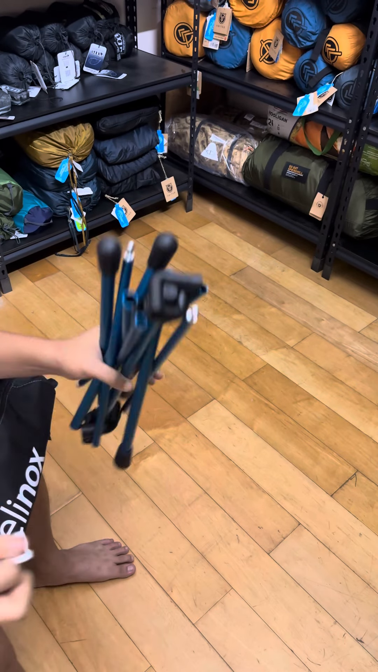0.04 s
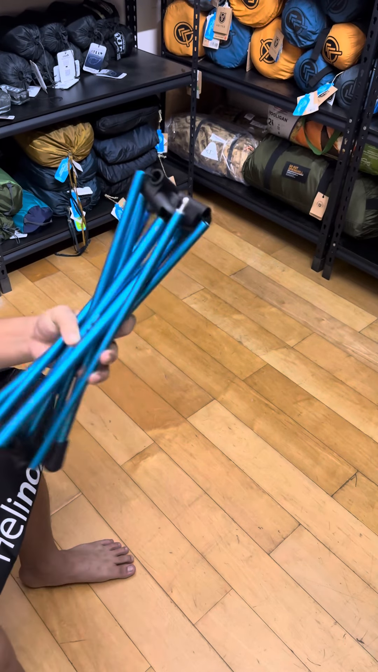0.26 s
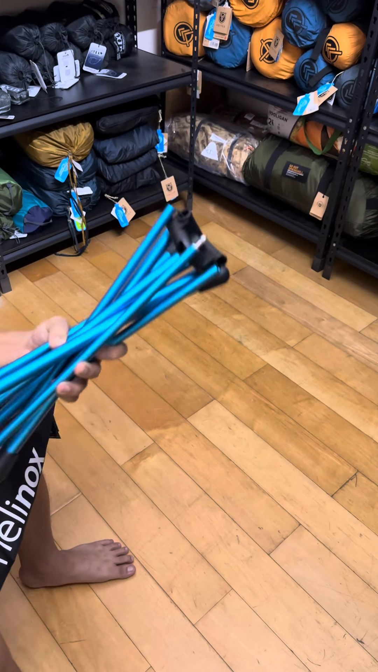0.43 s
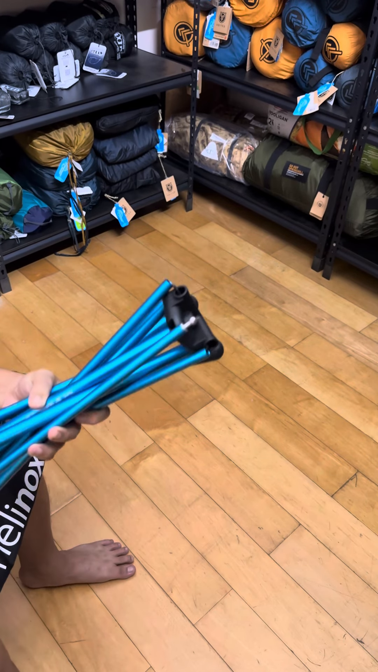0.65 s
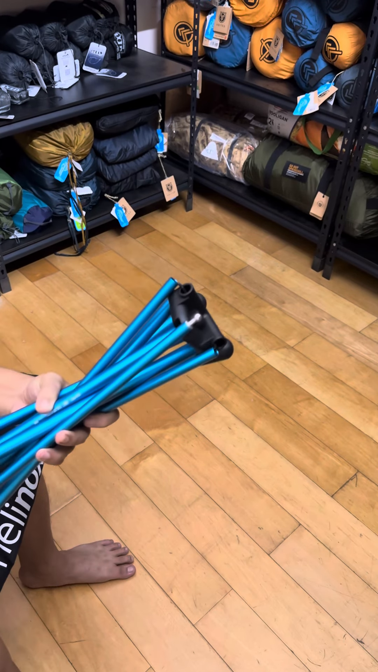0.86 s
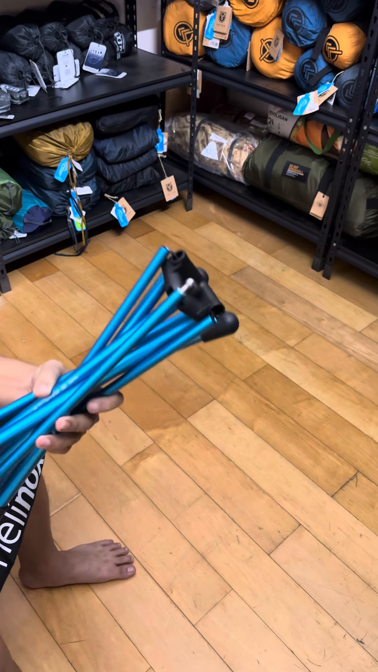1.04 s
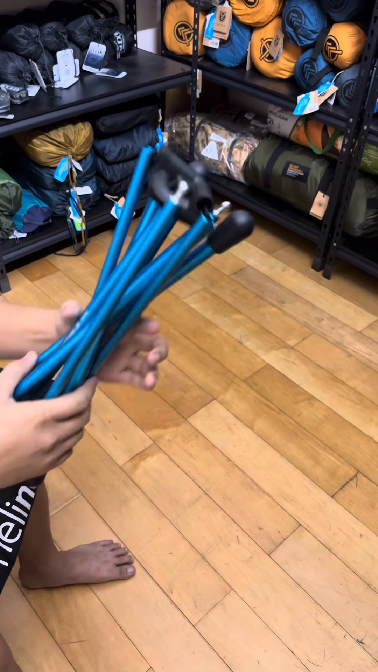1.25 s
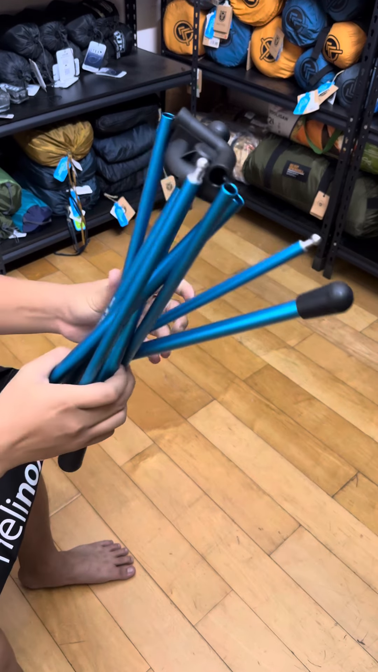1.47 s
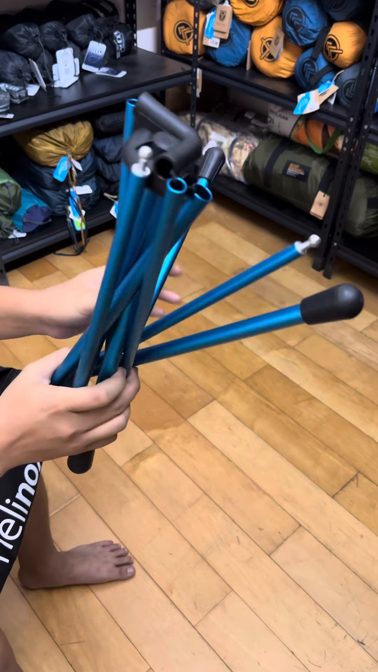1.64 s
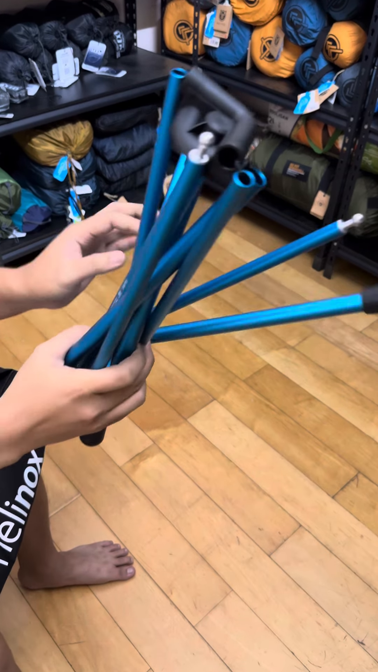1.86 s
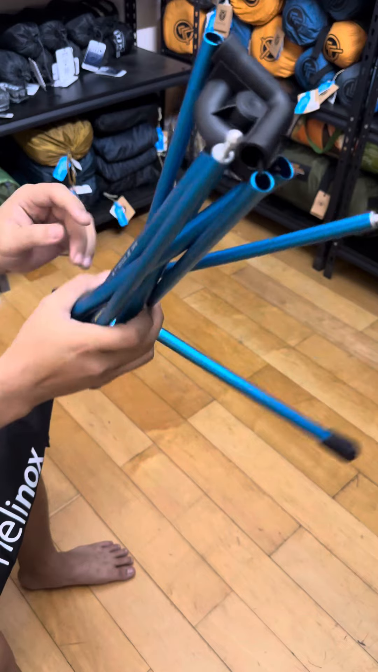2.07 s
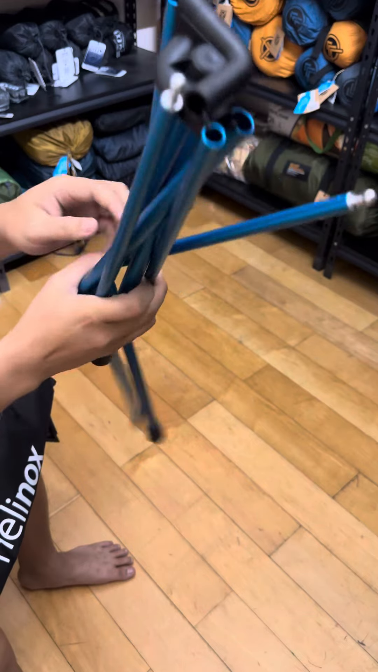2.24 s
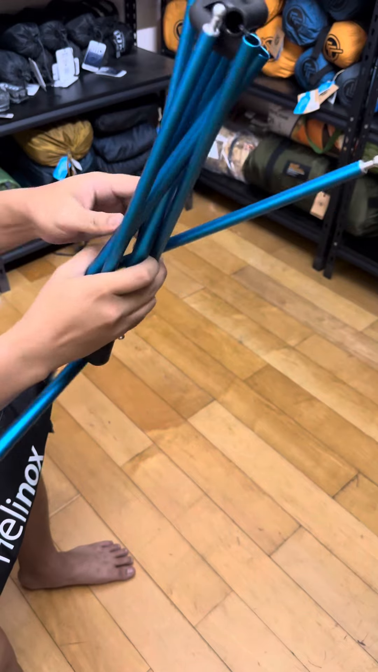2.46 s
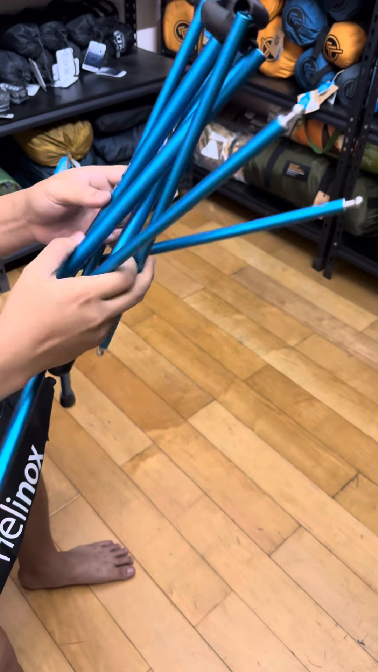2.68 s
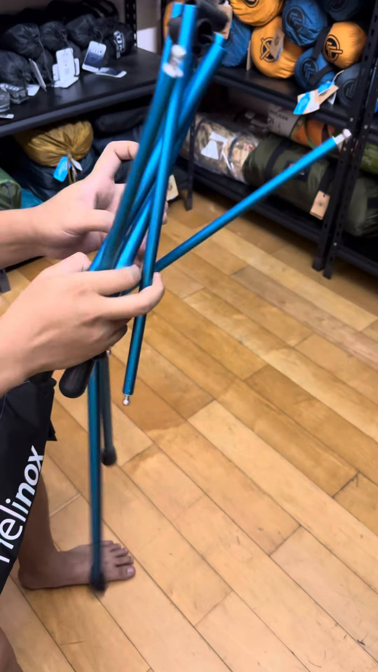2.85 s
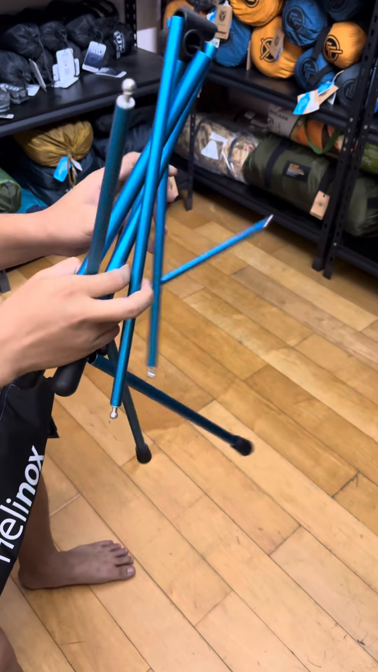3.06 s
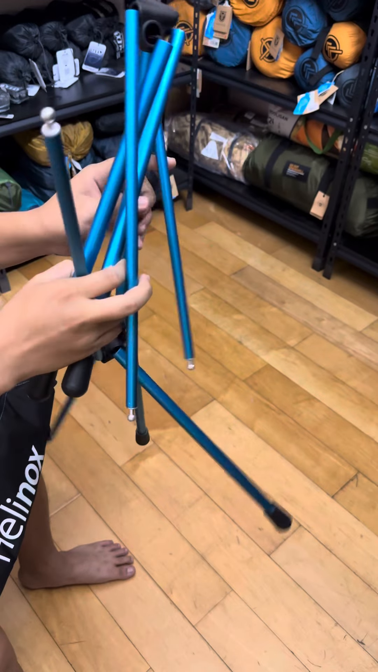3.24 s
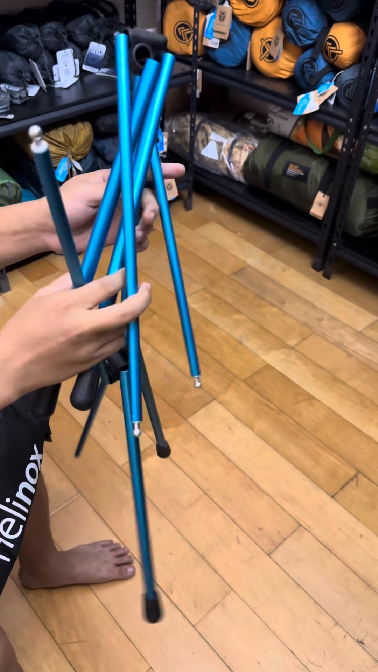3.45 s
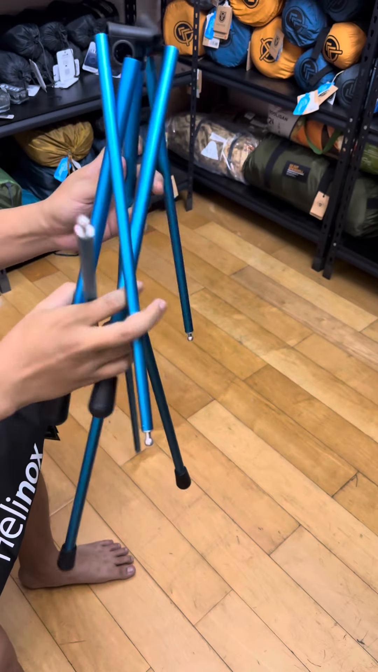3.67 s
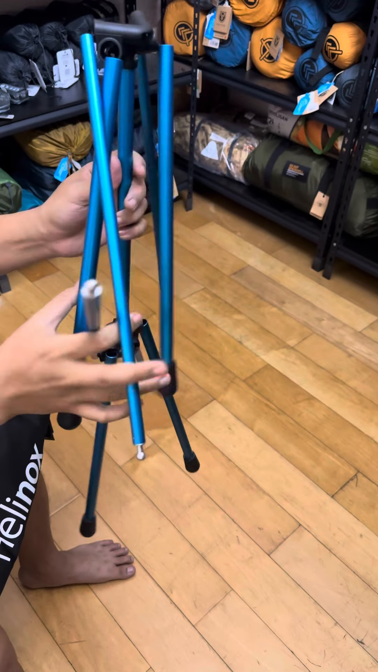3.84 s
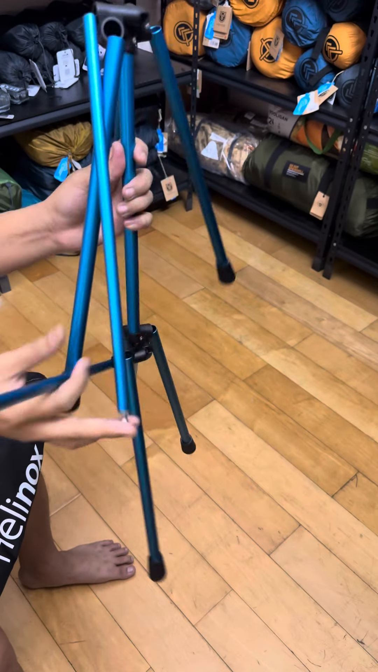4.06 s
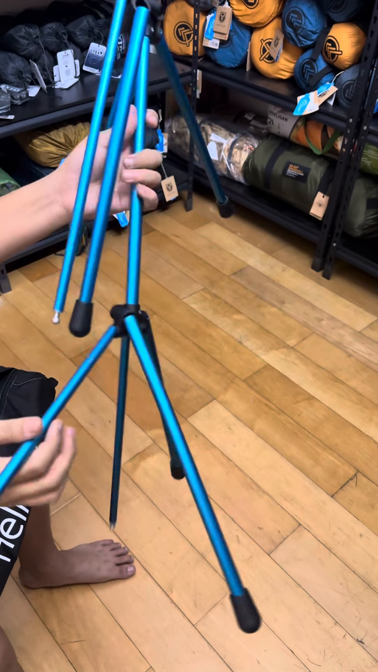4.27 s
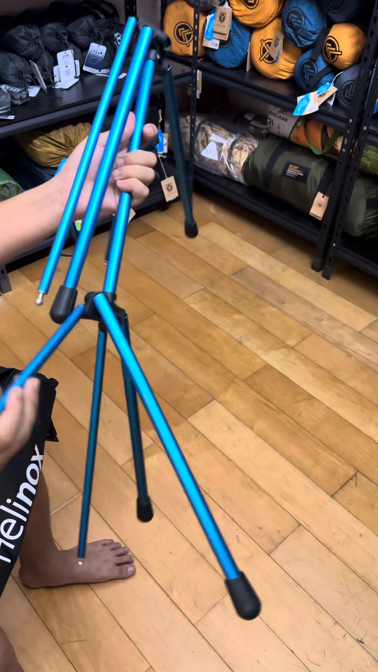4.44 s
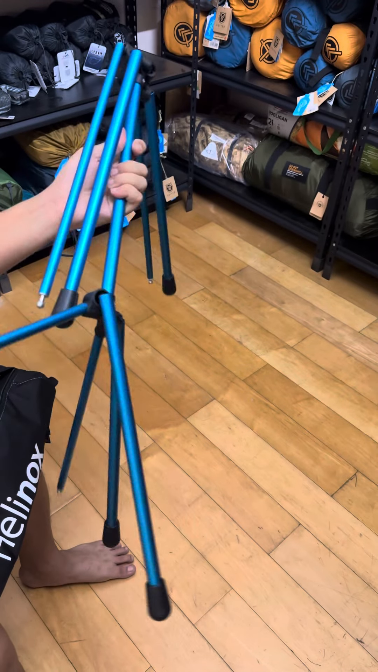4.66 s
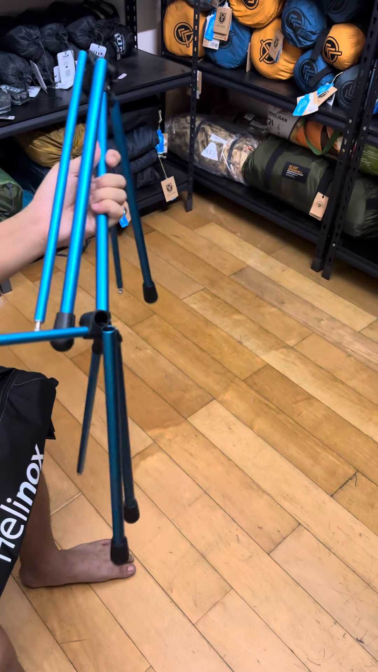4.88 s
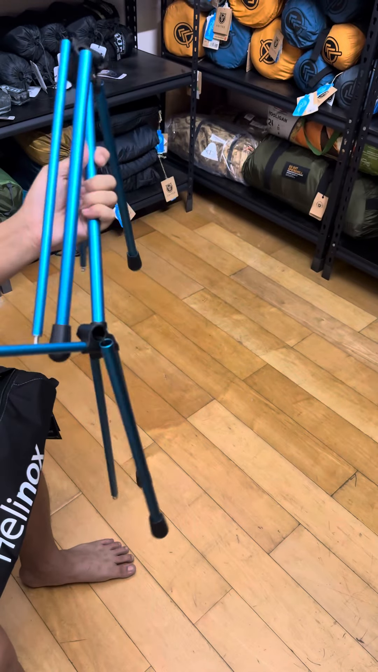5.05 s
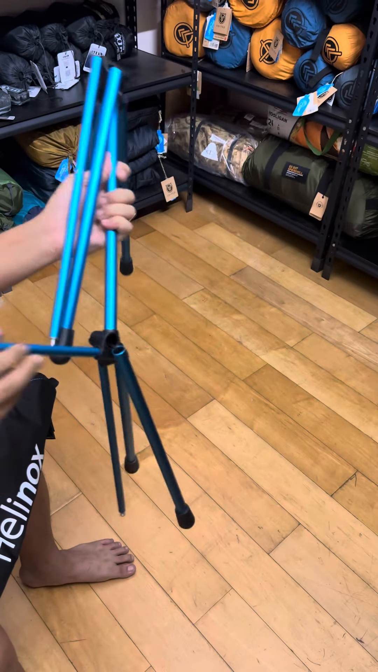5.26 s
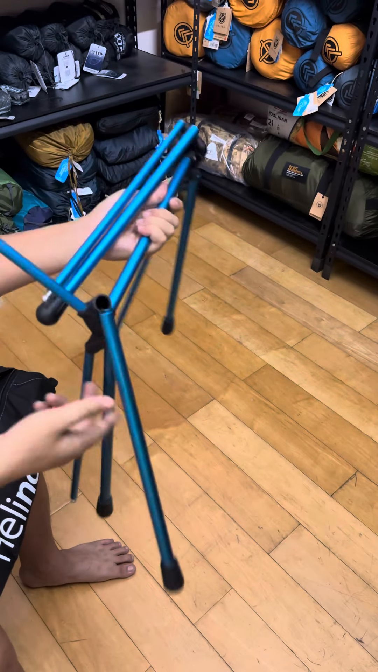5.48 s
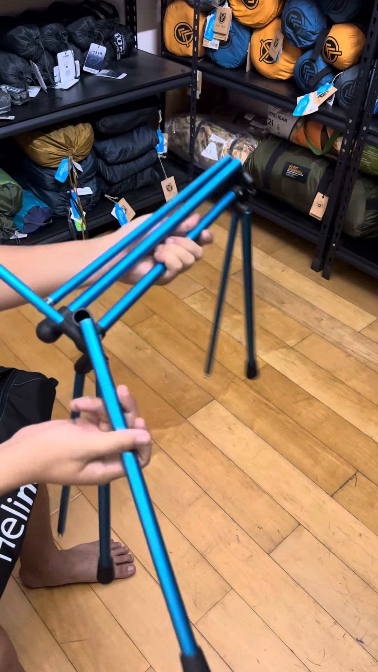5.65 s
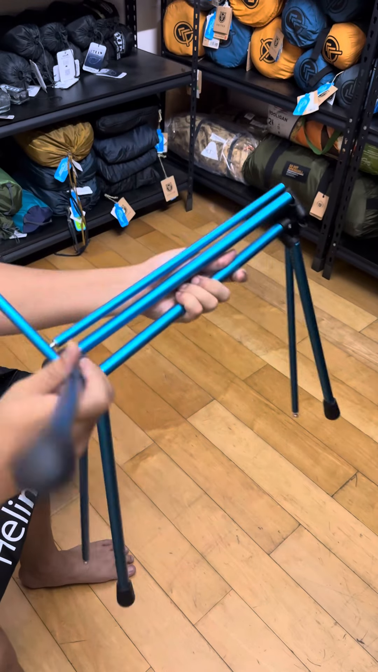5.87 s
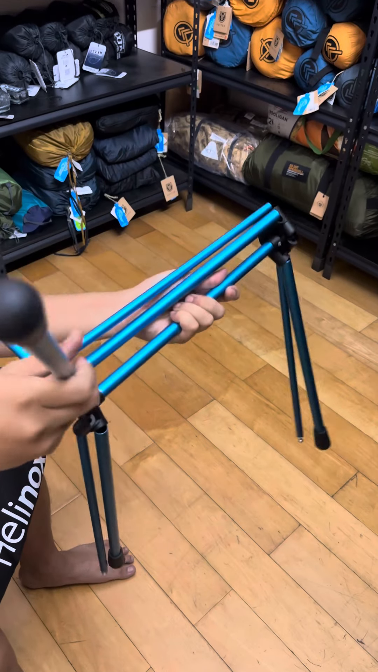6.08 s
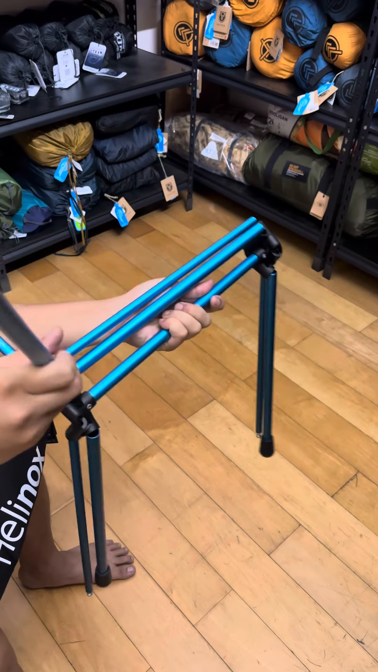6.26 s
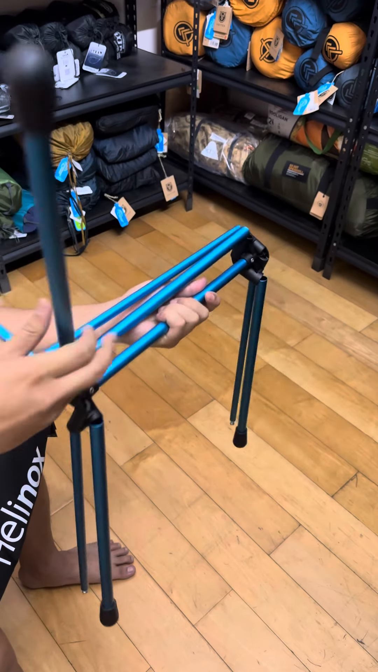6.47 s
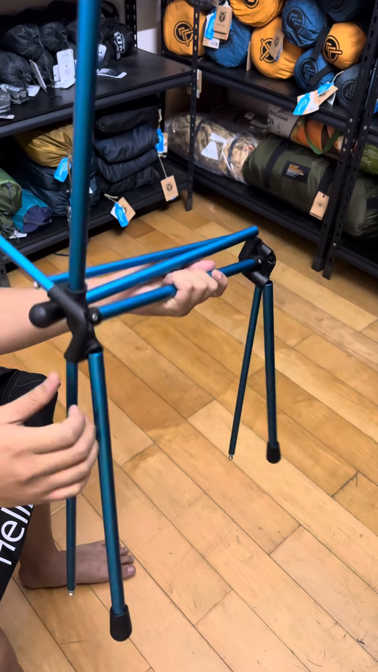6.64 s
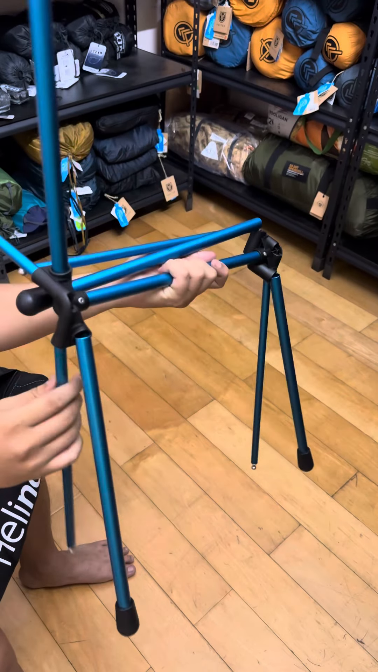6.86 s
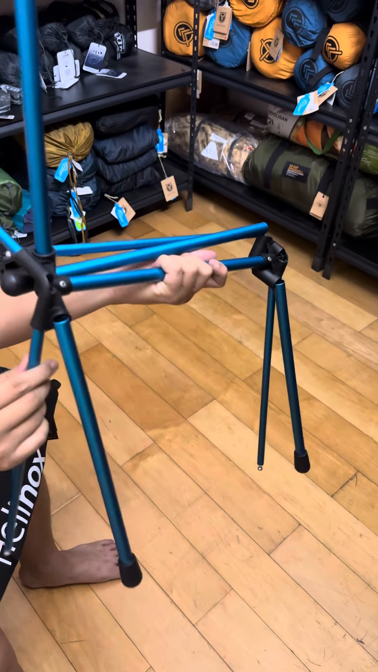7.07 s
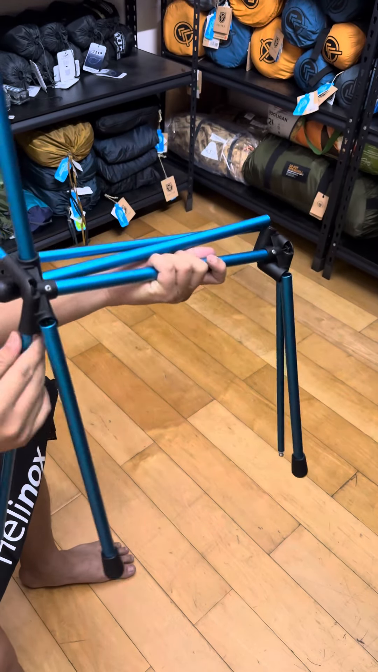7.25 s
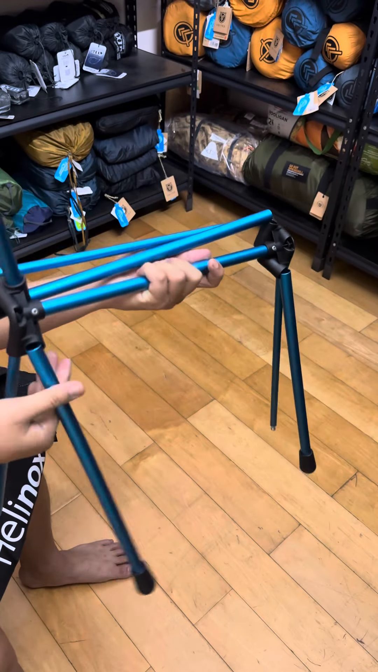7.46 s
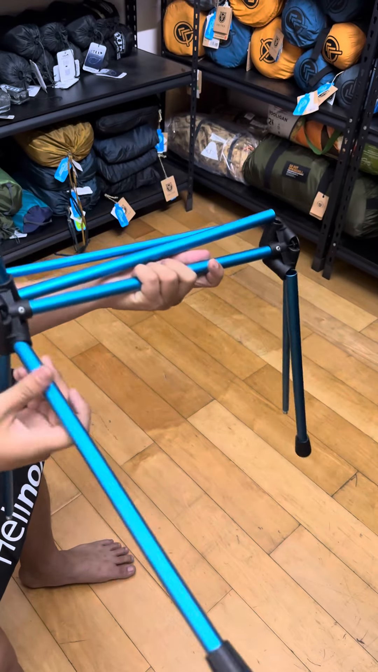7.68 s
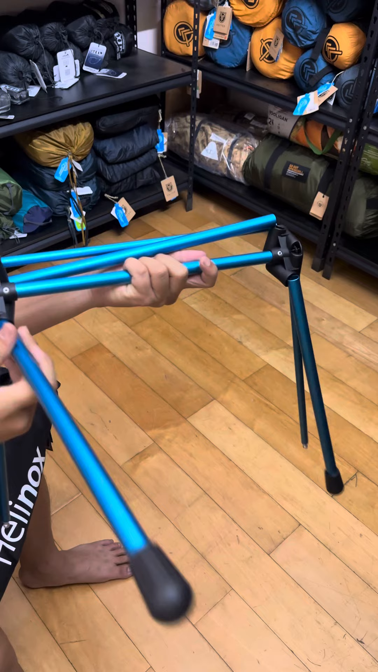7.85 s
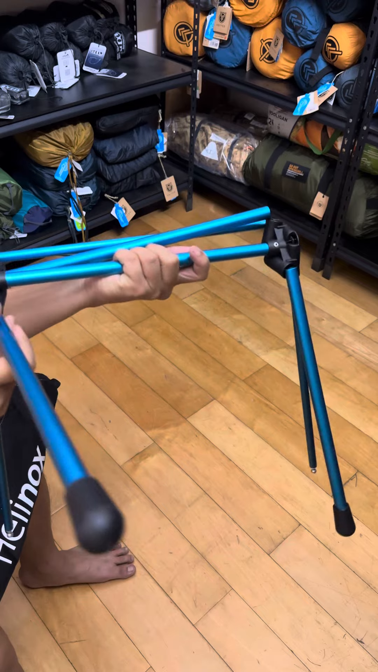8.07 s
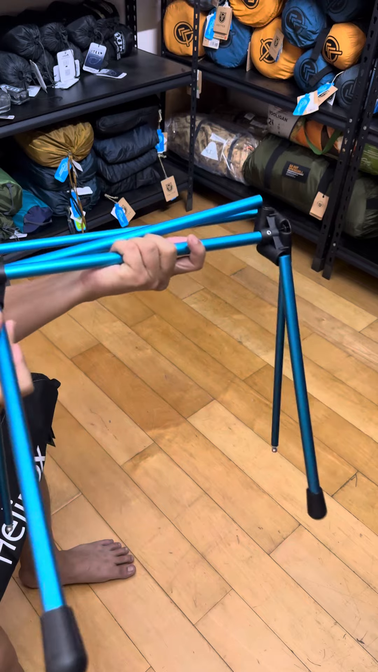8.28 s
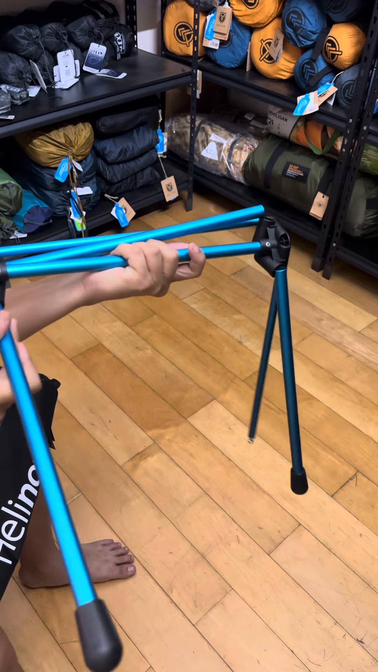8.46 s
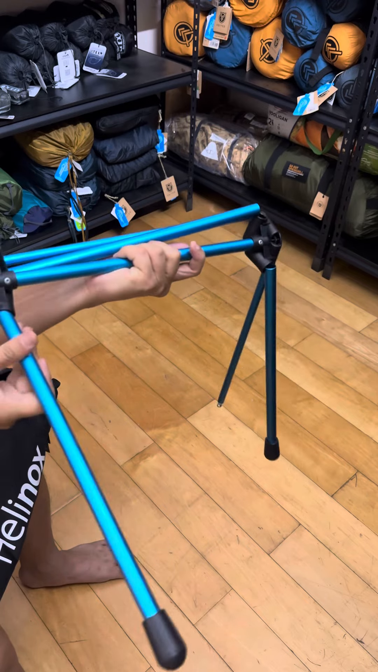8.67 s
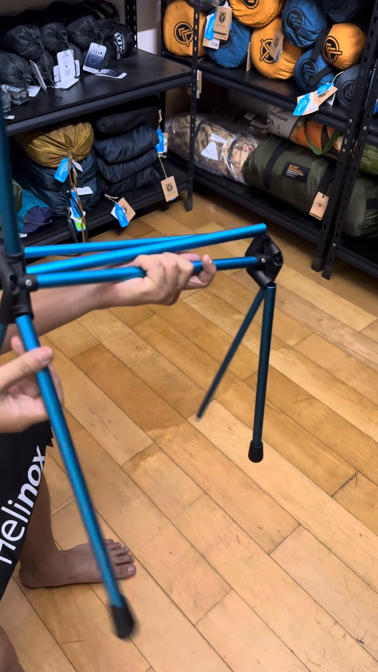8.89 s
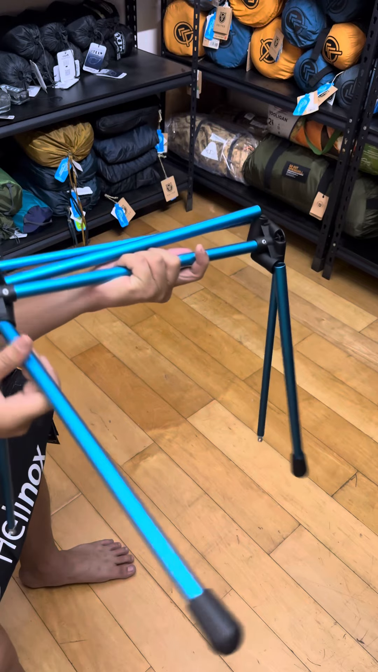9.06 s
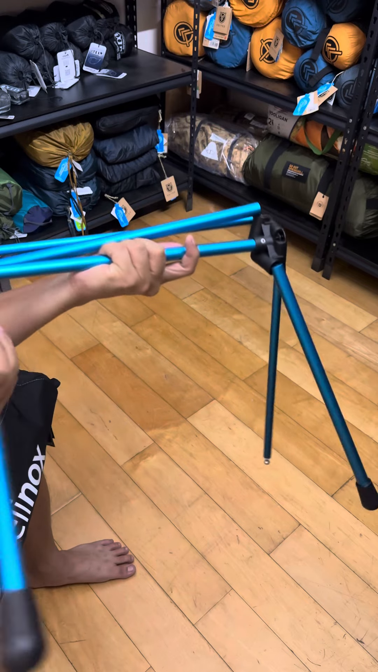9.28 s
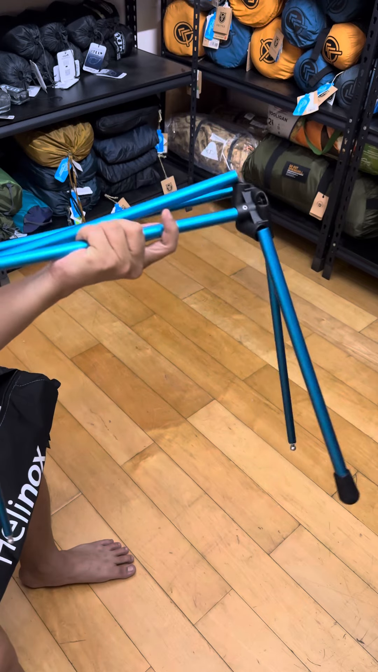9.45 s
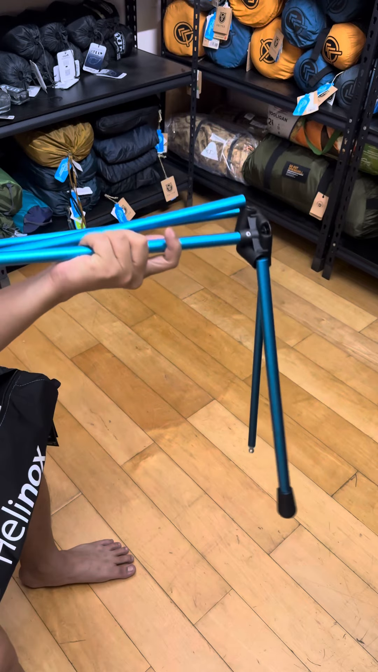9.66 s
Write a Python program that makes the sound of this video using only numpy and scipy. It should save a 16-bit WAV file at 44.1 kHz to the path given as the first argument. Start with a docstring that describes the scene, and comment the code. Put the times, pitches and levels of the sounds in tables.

```python
"""A small storeroom with a wooden floor: a bundle of shock-corded aluminium poles is unfolded before a phone.
Tubes clatter together as bursts of ticking noise, and each contact makes the metal ring as dying tones.
Tubes slide home with a rising whistle of narrow noise; hands and cord rub along them as grainy hiss.
The room answers with a short tail of fading noise, over a low building rumble and a far hum."""
import sys
import numpy as np
from scipy import signal
from scipy.fft import rfft, irfft
from scipy.io import wavfile
from scipy.ndimage import uniform_filter1d

SR = 44100
rng = np.random.default_rng(int(sys.argv[2]) if len(sys.argv) > 2 else 0)


def generate_wav(signal):
    """Clip the signal to [-1, 1] and save it as 16-bit WAV at the path in sys.argv[1]."""
    frames = np.transpose(np.atleast_2d(signal))
    scaled = np.clip(frames, -1, 1) * 32767
    pcm = np.round(scaled).astype(np.int16)
    wavfile.write(sys.argv[1], SR, pcm)


N = 428652  # length of the scene [samples]
LEAD = 128  # room left ahead of the first touch in each contact [samples]


def undb(db):
    """Turn decibels into an amplitude factor."""
    return 10 ** (np.asarray(db) / 20)


def level(x, db):
    """Scale a sound to an average (RMS) level in dB."""
    return x * undb(db) / np.sqrt(np.mean(x ** 2))


def gain(table, size):
    """Gain of (pitch [Hz], level [dB]) points at each frequency step of a transform of this size."""
    hz, db = np.transpose(table)
    f = np.arange(size // 2 + 1) * SR / size + 1
    return undb(np.interp(np.log(f), np.log(hz), db))


def colour(x, table):
    """Filter a sound to the gains of a table; folding the cepstrum keeps the filter from sounding early."""
    size = 8192
    cepstrum = irfft(np.log(gain(table, size)))
    cepstrum[1:size // 2] *= 2
    cepstrum[size // 2 + 1:] = 0
    response = irfft(np.exp(rfft(cepstrum)))
    return signal.oaconvolve(x, response)[:len(x)]


def band(x, lo_hz, hi_hz):
    """Keep only the pitches between two limits (Butterworth band-pass)."""
    limits = [lo_hz, min(hi_hz, .45 * SR)]
    return signal.sosfilt(signal.butter(2, limits, "band", fs=SR, output="sos"), x)


def walk(rate):
    """Random wandering values: a new one every 1 / rate seconds, joined by straight slopes."""
    hold = int(SR / rate)
    steps = np.repeat(rng.standard_normal(N // hold + 1), hold)
    return uniform_filter1d(steps, hold)[:N]


def add(track, s, x):
    """Mix x into track from time s in seconds."""
    i = int(s * SR)
    track[i:i + len(x)] += x[:N - i]


def hum():
    """A far low hum swells and fades: one sine whose pitch and level glide."""
    # path of the hum: (time [s], pitch [Hz], level [dB])
    hum_path = [(1.42, 76.6, -56), (1.55, 78.6, -43.5), (1.75, 77.7, -52), (1.9, 79.55, -43.5),
                (2.55, 78.1, -41), (2.72, 79, -57)]
    s, hz, db = np.transpose(hum_path)
    t = np.arange(N) / SR
    fade = np.clip(np.minimum(t - s[0], s[-1] - t) / 0.065, 0, 1)
    wave = np.sqrt(2) * np.sin(2 * np.pi * np.cumsum(np.interp(t, s, hz)) / SR)
    return wave * undb(np.interp(t, s, db)) * fade


def rumble():
    """Building noise that wavers gently and gathers at room resonances; returns microphone sum and difference."""
    # colour of the rumble in the sum of the two microphones: (pitch [Hz], relative level [dB per Hz])
    sum_colour = [(15, -48.5), (25, -26), (43, -8), (70, -2.5), (97, -0.5), (175, -12), (200, -10),
                  (309, -9.5), (384, -6), (416, -14), (734, -17), (1330, -28.5), (2690, -32), (3520, -37),
                  (16000, -93)]
    # the same in their difference: (pitch [Hz], relative level [dB per Hz])
    difference_colour = [(15, -43.5), (25, -14), (53, -8.5), (236, -13), (317, -3), (439, -5), (476, -3),
                         (863, -4), (2000, -24), (3250, -18.5), (3920, -27), (16000, -63)]
    # room resonances where the rumble gathers: (pitch [Hz], width [Hz], relative level [dB])
    resonances = [(50.7, 13, 0), (101.9, 62, -0.5), (209.1, 12, -3), (250.2, 4.5, -0.5), (309.7, 25, 0.5),
                  (356.6, 47, -7), (410.5, 20, -1)]
    mid = level(colour(rng.standard_normal(N), sum_colour), -45.5) * undb(1.2 * walk(1.2))
    gathered = np.zeros(N)
    for hz, width, db in resonances:
        noise = band(rng.standard_normal(N), hz - width / 2, hz + width / 2)
        gathered += level(noise, db)
    mid += level(gathered, -50)
    side = level(colour(rng.standard_normal(N), difference_colour), -55)
    return mid + hum(), side


def room(x):
    """Echoes blurred into a tail: octave bands of noise, each dying at its own rate."""
    # how long echoes take to fall by 60 dB: (pitch [Hz], time [s])
    fade_times = [(500, 0.22), (2000, 0.32), (6000, 0.43), (14000, 0.34)]
    table_hz, table_t60 = np.transpose(fade_times)
    t = np.arange(int(.6 * SR)) / SR
    tail = np.zeros(len(t))
    for hz in 250 * 2. ** np.arange(7):
        t60 = np.interp(np.log(hz), np.log(table_hz), table_t60)
        noise = band(rng.standard_normal(len(t)), hz / np.sqrt(2), hz * np.sqrt(2))
        tail += noise * np.exp(-np.log(1000) * t / t60)
    tail *= 1 - np.exp(-(t / 0.0023) ** 2)  # the first echoes need a few ms to arrive
    return signal.oaconvolve(x, tail / np.sqrt(np.sum(tail ** 2)))[:N]


def rub():
    """Stick-slip hiss of hands and cord: noise of uneven grain; each stroke rises, holds and falls."""
    # strokes along the tubes: (start [s], hold [s], level [dB], dry-skin hiss relative to it [dB])
    strokes = [(.6, 0.1, -64.5, 12.5), (1.087, 0.092, -60, 10), (1.198, 0.13, -52, 0.5),
               (1.45, 0.13, -63, 11), (1.72, 0.067, -63.5, -2.5), (2.04, 0.12, -42.5, 10),
               (2.2, 0.25, -55.5, 0.5), (2.742, 0.076, -46.5, 4), (2.95, 0.48, -58, 1),
               (3.52, 0.28, -67.5, 12.5), (3.83, 0.22, -60, 16.5), (4.2, 0.32, -71.5, -1.5),
               (4.7, 0.059, -70.5, 3.5), (5.05, .15, -67.5, -4), (5.902, 0.11, -73, -10),
               (6.113, .18, -64.5, -4.5), (7.144, 0.09, -44.5, 0), (7.25, 0.28, -68, -7),
               (7.62, 0.11, -68.5, 5), (8.721, 0.089, -76, 8), (8.8, 0.14, -73, -12),
               (9.5, 0.096, -72.5, -10.5)]
    # tone of the main hiss: (pitch [Hz], relative level [dB])
    hiss_colour = [(500, -38), (2000, 3.5), (4000, 2.5), (7000, -0.5), (10000, -13.5), (13000, -6.5),
                   (17000, -27.5)]
    rise_db_per_s, fall_db_per_s = 1200, 200
    grip_db, grip_skin_db = -81, -3.5  # the holding hand rubs faintly all along
    grain = rng.standard_normal(N) * undb(3 * walk(40) + 3 * walk(600))
    t = np.arange(0, N + 64, 64) / SR  # a coarse time grid is enough for the strokes
    start, hold, db, skin_db = np.transpose(strokes)[:, :, None]
    rise = rise_db_per_s * np.maximum(start - t, 0)
    fall = fall_db_per_s * np.maximum(t - start - hold, 0)
    power = undb(db - rise - fall) ** 2
    skin_power = power * undb(skin_db) ** 2
    broad_curve = np.sqrt(power.sum(axis=0) + undb(grip_db) ** 2)
    skin_curve = np.sqrt(skin_power.sum(axis=0) + undb(grip_db + grip_skin_db) ** 2)
    every_sample = np.arange(N) / SR
    broad = np.interp(every_sample, t, broad_curve) * level(colour(grain, hiss_colour), 0)
    skin_hiss = band(band(grain, 12800, 15800), 12800, 15800)
    return broad + np.interp(every_sample, t, skin_curve) * level(skin_hiss, 2.3)


def slides():
    """A tube slides home: a narrow band of scrape noise climbs as the trapped air pocket shrinks."""
    # slides: (start [s], end [s], start pitch [Hz], end pitch [Hz], level before the swell [dB])
    slide_list = [(2.937, 2.966, 1490, 4030, -47), (3.252, 3.285, 1550, 3550, -54),
                  (4.973, 4.992, 2170, 3064, -47.5), (5.09, 5.155, 3050, 6460, -53),
                  (7.121, 7.14, 1080, 9860, -42.5), (8.181, 8.234, 1010, 4580, -47)]
    out = np.zeros(N)
    for start, end, from_hz, to_hz, db in slide_list:
        u = np.linspace(0, 1, int((end - start) * SR))  # progress of the slide
        carrier = np.sin(2 * np.pi * np.cumsum(from_hz * (to_hz / from_hz) ** u) / SR)
        scrape = band(rng.standard_normal(4096), 30, 550)[:len(u)]
        swell = u * np.minimum(1, (1 - u) * 12)
        add(out, start, level(carrier * scrape, db) * swell)
    return out


def ring(modes, chance, scatter_db, detune):
    """Dying tones of a struck body; each blow lands elsewhere and wakes them unevenly."""
    hz, db, t60 = np.transpose(modes)[:, :, None]
    t = np.arange(int(.3 * SR)) / SR
    tones = np.sin(2 * np.pi * hz * (1 + detune * chance[1][:, None]) * t)
    waves = tones * np.exp(-np.log(1000) * t / t60)
    return np.sum(undb(db + scatter_db * chance[0][:, None]) * waves, axis=0)


def cracks(hz, body_db, edge_db):
    """Noise of each contact: the chatter heard directly, and one smooth blow of like energy sent all around."""
    size = 4096
    # a higher contact pitch means a shorter touch
    touch_ms = 2.33 * (3000 / hz) ** 0.32
    rattle_db, rattle_ms = -17, 33  # the loose bundle chatters on after each contact
    t = np.arange(size - 2 * LEAD) / SR
    touch = np.exp(-(t * 1000 / np.maximum(touch_ms, .3)[:, None]) ** 1.1)
    shape = touch + undb(rattle_db) * np.exp(-t * 1000 / rattle_ms)
    noise, spikes = rng.standard_normal((len(hz), 2, len(t))).transpose(1, 0, 2)
    onset = 1 - np.exp(-t / 0.00027)
    chatter = noise * undb(4 * spikes) * shape * onset  # metal on metal touches in separate ticks
    spectrum = rfft(chatter, size)
    # a short blow excites all pitches evenly
    spectrum /= np.sqrt(uniform_filter1d(np.abs(spectrum) ** 2, size=90, axis=1))

    # tilt by the body and edge of the blow, with a hump at the contact pitch
    f = np.arange(size // 2 + 1) * SR / size + 1
    low = np.clip(0.77 * np.log2(2100 / f), 0, 1)
    high = np.clip(0.77 * np.log2(f / 3500), 0, 1)
    db = np.outer(body_db + 14.5, low) + np.outer(edge_db + 4, high)
    db += 7 * np.exp(-(np.log2(f / hz[:, None]) / 0.2) ** 2)
    db -= 9 * np.maximum(np.log2(900 / f), 0)  # thin tubes give no bass
    db -= 3 * np.maximum(np.log2(f / 7000), 0)
    energy = np.sqrt(np.sum(shape ** 2, axis=1))[:, None]
    delay = np.exp(-2j * np.pi * f * LEAD / SR)
    strength = undb(db) * energy * delay
    return irfft(strength * spectrum), irfft(strength)


def clacks():
    """Each contact cracks, bends the tube and rings its wall; returns direct sound and what the room gets."""
    # tube against tube or socket: (time [s], relative level [dB], contact pitch [Hz],
    # relative body under 1.5 kHz [dB], relative edge over 5 kHz [dB])
    contacts = [(1.1527, -8.5, 3300, -68, -5), (1.167, -20, 6300, -14, 0), (1.197, -11, 3950, -24, 0),
                (1.2232, -12, 5460, -46, -1), (1.2286, -11.5, 6650, -23, -14), (1.252, -16, 5830, -25, -27),
                (1.2608, -15.5, 2670, -21, -34), (1.3526, -20.5, 4240, -41, -7.5),
                (1.3603, -21, 4940, -33, -9), (1.4096, -14, 2700, -50, -12), (1.4126, -22, 3320, -12, -13),
                (1.5394, -35, 2820, -25, -18), (1.6833, -27.5, 2470, -55, -11.5),
                (1.731, -33, 3010, -26, -17), (1.93, -6.5, 2450, -27, -15.5),
                (2.0512, -18.5, 3200, -21, -12), (2.115, -14, 5800, -20.5, -3.5),
                (2.134, -15, 5840, -40, -12), (2.1624, -13.5, 3100, -25, -14.5),
                (2.285, -12, 1663, -16.5, -22), (2.4053, -20.5, 4200, -19, -3.5),
                (2.4386, -20.5, 5220, -20, -8), (2.58, -16.5, 2620, -15.5, -3),
                (2.6166, -20.5, 2880, -26, -4), (2.6443, -24, 1600, -6.5, -29),
                (2.6782, -24.5, 4610, -35, -8), (2.734, -20, 3110, -35, -9), (2.742, -17.5, 2600, -35, -12),
                (2.772, -25, 2550, -47, -28), (2.82, -20.5, 2360, -32, -31),
                (2.854, -13.5, 6300, -19, -14.5), (2.8687, -30, 6500, -29.5, -3),
                (2.9655, 0, 1364, -19, -22), (2.9718, 0.5, 3180, -35, -17),
                (3.2813, -4.5, 1353, -6.5, -7.5), (3.2916, -14, 6350, -4, 3.5),
                (3.4096, -25.5, 3500, -27, -10), (3.5142, -32, 1830, -27, -8.5),
                (3.9367, -29, 3500, -16, -7.5), (4.0928, -20.5, 9300, -8.5, -5.5),
                (4.173, -11, 6530, -22, -4), (4.2285, -8.5, 2850, -31, -6), (4.2801, -23, 4340, -8.5, -5),
                (4.9835, -41.5, 2830, -16.5, -13.5), (5.1585, -7, 2660, -15, -10),
                (5.445, -38, 2580, -16, -25), (5.593, -21, 4180, -26, 3), (5.8366, -31, 1230, -7.5, -21),
                (6.1214, -38.5, 2110, -23, -9.5), (6.2127, -24.5, 5940, -21, -0.5),
                (6.2915, -25, 6120, -19, -11.5), (6.3573, 2, 1500, -19, -11),
                (6.6356, -32.5, 6230, -6, -4.5), (7.151, -24.5, 2250, -6, -7.5),
                (7.197, -11.5, 2220, -13, -24), (7.4193, -37.5, 2980, -22, -28),
                (7.447, -37, 2330, -27, -30), (7.4938, -35, 2110, -11, -33), (7.5778, -42, 2950, -11, -6.5),
                (7.6505, -34.5, 3170, -14, -20), (8.2361, -1.5, 2650, -21.5, -11.5),
                (8.2603, -2.5, 3150, -21, -16.5), (8.2894, -7.5, 2900, -25, -12),
                (8.7098, -43, 1205, -4, -34), (8.837, -38, 2510, -25, -30), (8.962, -36, 5000, -30, -14),
                (8.981, -20, 7000, -31, -4.5), (9.181, -38, 2770, -19, -24.5),
                (9.499, -40.5, 2910, -21, -20.5), (9.5771, -40, 2510, -14.5, -22),
                (9.685, -40, 2900, -12, -28.5)]
    # bending tones of a tube: (pitch [Hz], relative level [dB], time to fall 60 dB [s])
    bending = [(1530, -12.5, 0.078), (2260, -5.5, 0.075), (2770, -5.5, .06), (3120, -13, 0.42),
               (3146, -7, 0.31), (3040, -16.5, 0.22), (3670, -21, .1), (4100, -12, 0.13),
               (4520, -11.5, 0.11), (5740, -13.5, 0.028), (6250, -10, 0.07), (6560, -8, 0.06)]
    # hubs and hands jolt dully: (pitch [Hz], relative level [dB], time to fall 60 dB [s])
    thump = [(229, -16, .07), (598, -18, 0.052)]
    # odd partials of the air in a tube: (pitch [Hz], relative level [dB], time to fall 60 dB [s])
    air_column = [(561, 0.87, 0.11), (1590, 6.9, 0.076)]
    bending_db, bending_db_per_octave = -24.5, -7  # tones far from the contact pitch wake less
    loose_until_s, seated_wall_db = 4.4, -9  # once most tubes sit in their sockets the wall ring is damped
    direct, spread, rings = np.zeros((3, N))
    s, db, hz, body_db, edge_db = np.transpose(contacts)
    chance = rng.standard_normal((len(s), 3, len(bending)))
    # the round wall breathes near 14 kHz; the pitch depends on the tube
    wall_hz = 14340 * (1 + 0.026 * np.tanh(chance[:, 2, 0]))
    wall_db = -12.5 + 0.46 * edge_db + seated_wall_db * (s > loose_until_s)  # sharp edges ring it more
    chatter, blow = cracks(hz, body_db, edge_db)
    for k in range(len(s)):
        add(direct, s[k] - LEAD / SR, undb(db[k] - 5) * chatter[k])
        add(spread, s[k] - LEAD / SR, undb(db[k] - 4.5) * blow[k])
        woken = []
        for f, d, t60 in bending:
            octaves_away = abs(np.log2(f / hz[k]))
            woken.append((f, d + bending_db_per_octave * octaves_away, t60))
        add(rings, s[k], undb(db[k] + bending_db) * ring(woken, chance[k], scatter_db=3.5, detune=.009))
        jolt = ring(thump, chance[k, :, :len(thump)], scatter_db=2, detune=.05)
        add(direct, s[k], undb(db[k] + body_db[k]) * jolt)
        wall = [(wall_hz[k], wall_db[k], .06)] * 4  # four copies, detuned into a cluster
        breathing = ring(wall, chance[k, :, :len(wall)], scatter_db=6.9, detune=0.0091)
        add(rings, s[k], undb(db[k]) * breathing)
    # one tube end is knocked open and its air column sounds
    pop = ring(air_column, chance[0, :, :len(air_column)], scatter_db=0, detune=0)
    add(rings, 2.283, undb(-25) * pop)
    return direct + rings, spread + undb(-3) * direct + undb(3.0) * rings


def scene():
    """Mix near sound, echoes and rumble as sum and difference of two microphone ports, then as left and right."""
    # the ports lie a few cm apart, so treble cancels in their sum: (pitch [Hz], gain [dB])
    port_sum = [(300, -5.5), (1200, 1), (6500, 3.5), (9300, 0.5), (10300, -15), (12500, -21.5),
                (14500, -14.5), (16500, -25.5)]
    # treble stays in their difference: (pitch [Hz], gain [dB])
    port_difference = [(300, -15.5), (800, -3.5), (1800, -9.5), (3200, -0.5), (4800, 0.5), (6000, -0.5),
                       (12000, 3), (15500, -11)]
    room_db, room_side_db, near_side_db = -7.5, -5, -3
    left_db = -0.13  # left relative to right
    floor_mid, floor_side = rumble()
    soft = slides() + rub()
    direct, spread = clacks()
    direct, spread = direct + soft, spread + soft
    near = colour(direct, port_sum)
    # the echoes in the microphone sum are dark above about 10 kHz
    dark_filter = signal.butter(8, 9900, fs=SR, output="sos")
    echoes = signal.sosfilt(dark_filter, colour(room(spread), port_sum))
    # a lag between the ports puts their difference a quarter turn from their sum
    sum_to_difference = 1j * gain(port_difference, N) / gain(port_sum, N)
    near_side = irfft(rfft(near) * sum_to_difference, N)
    echoes_side = colour(room(spread), port_difference)
    mid = near + undb(room_db) * echoes + floor_mid
    side = undb(near_side_db) * near_side + undb(room_side_db) * echoes_side + floor_side
    return np.array([(mid + side) * undb(left_db / 2), (mid - side) * undb(-left_db / 2)])


def record(dry):
    """The phone drops the deepest bass, rounds the loudest peaks and cuts the top."""
    bass_cut = signal.butter(2, 38, "high", fs=SR, output="sos")
    top_cut = signal.ellip(12, .2, 100, 16600, fs=SR, output="sos")
    rounded = .95 * np.tanh(signal.sosfilt(bass_cut, dry) / .95)
    return signal.sosfilt(top_cut, rounded)


dry = scene()
out = record(dry)
generate_wav(out)
```